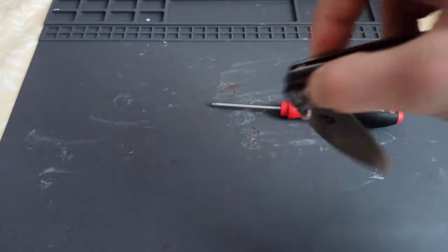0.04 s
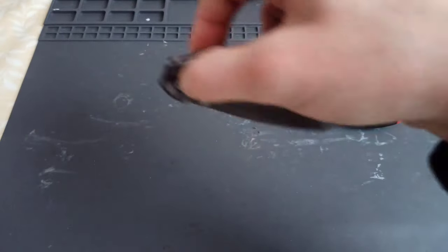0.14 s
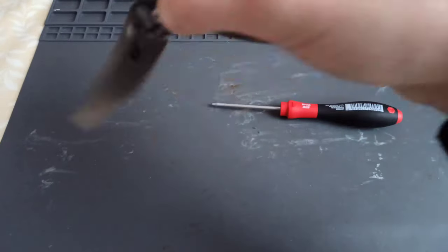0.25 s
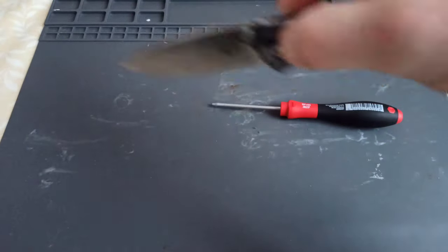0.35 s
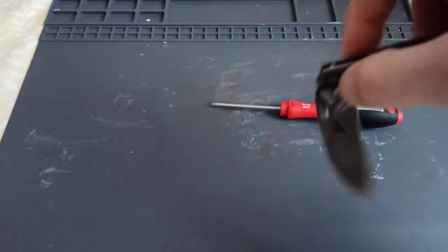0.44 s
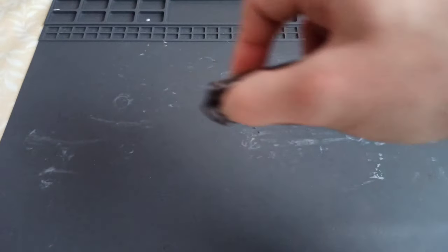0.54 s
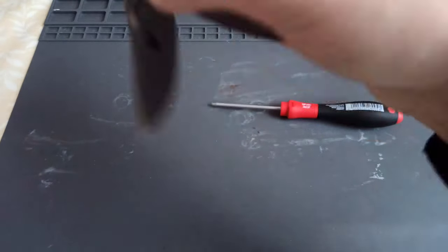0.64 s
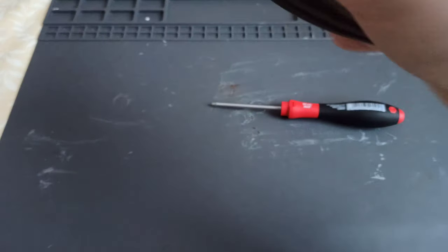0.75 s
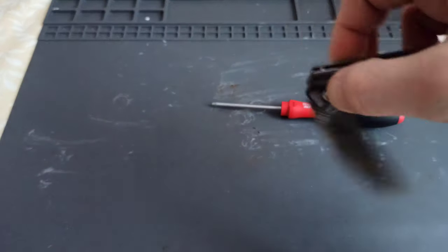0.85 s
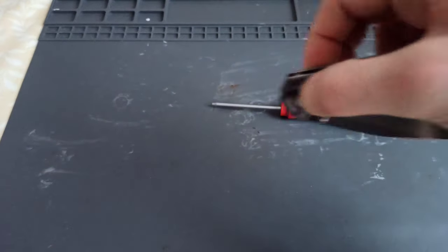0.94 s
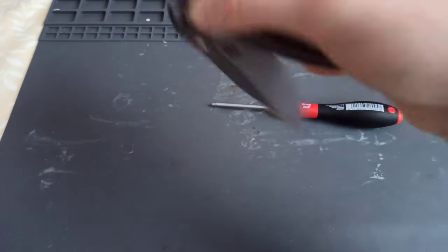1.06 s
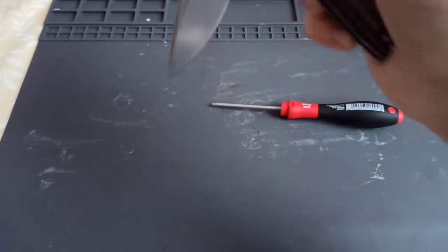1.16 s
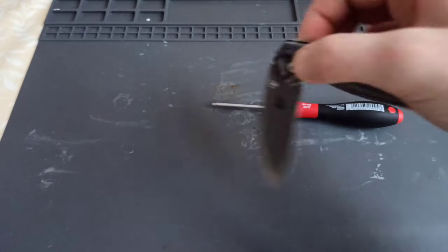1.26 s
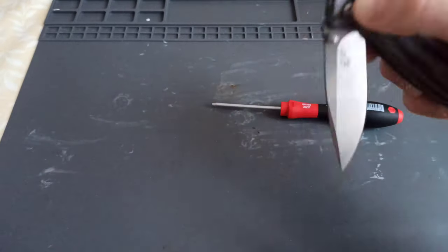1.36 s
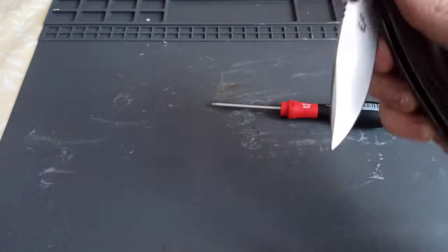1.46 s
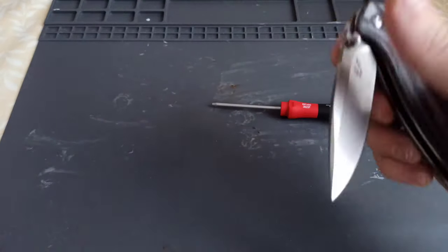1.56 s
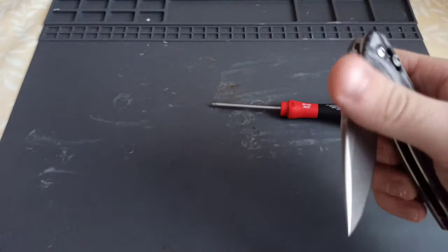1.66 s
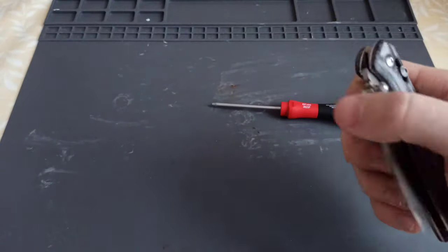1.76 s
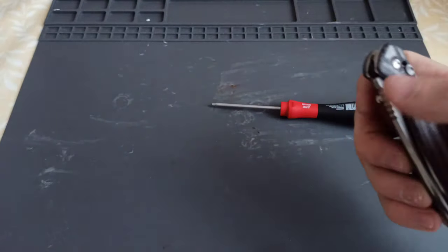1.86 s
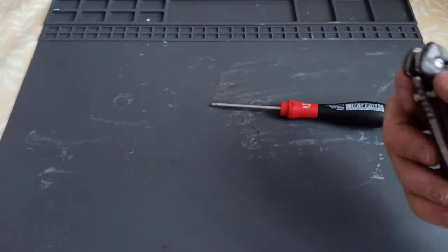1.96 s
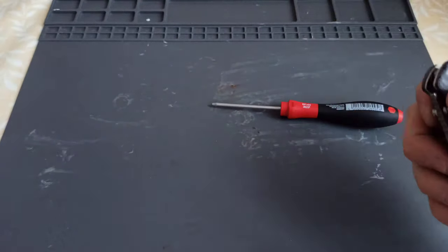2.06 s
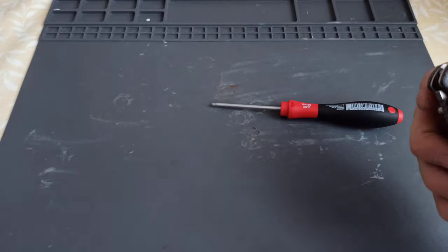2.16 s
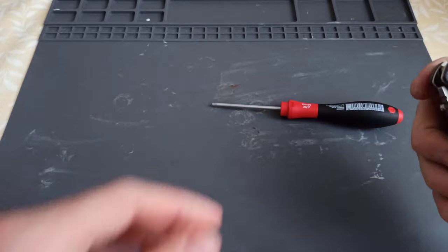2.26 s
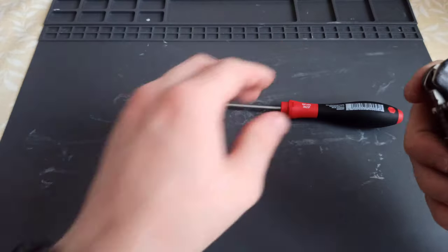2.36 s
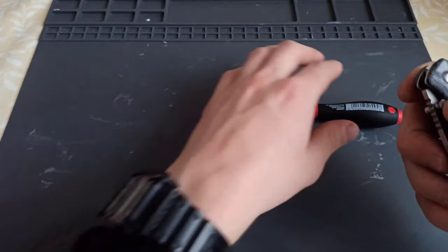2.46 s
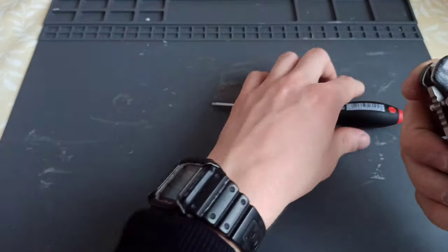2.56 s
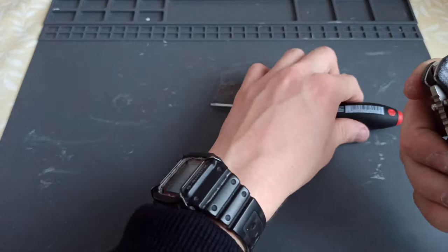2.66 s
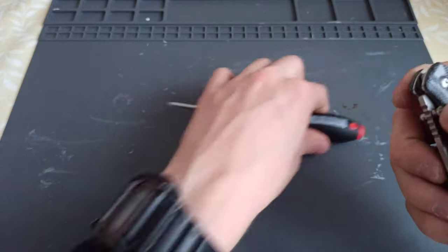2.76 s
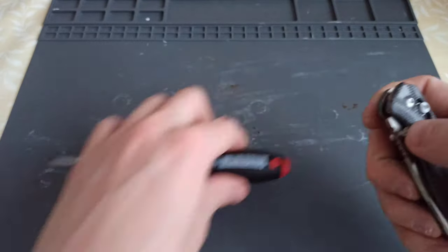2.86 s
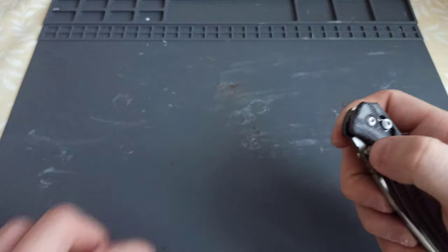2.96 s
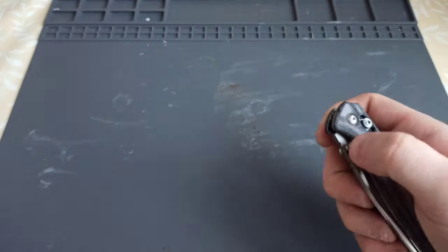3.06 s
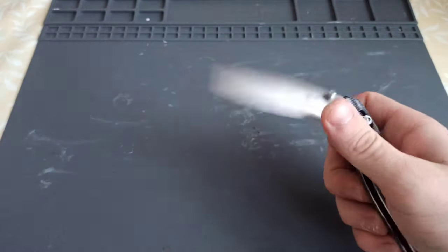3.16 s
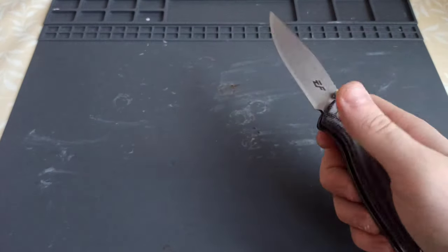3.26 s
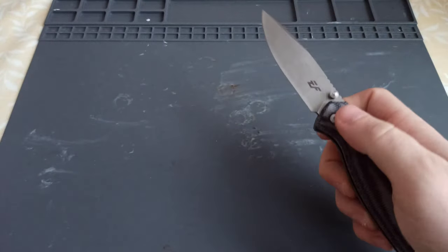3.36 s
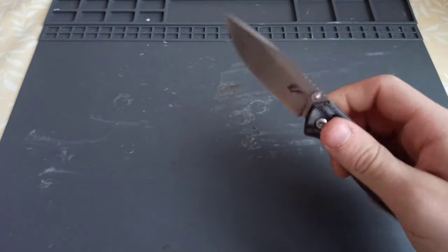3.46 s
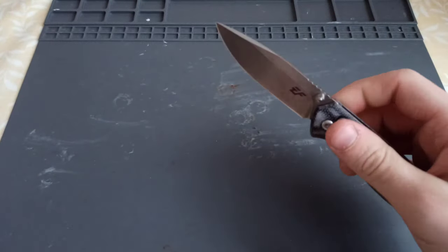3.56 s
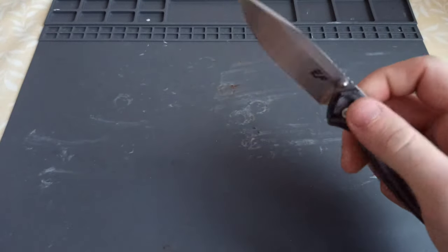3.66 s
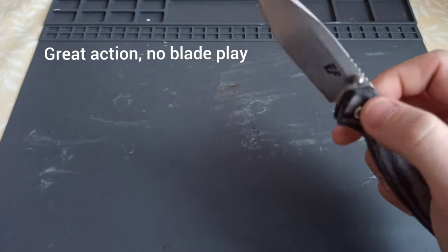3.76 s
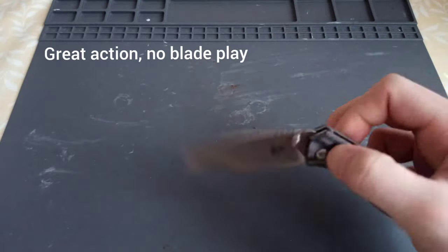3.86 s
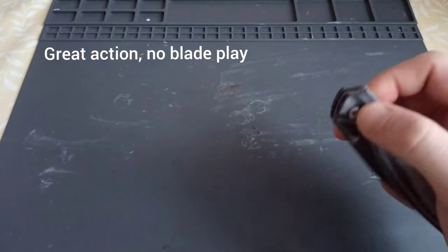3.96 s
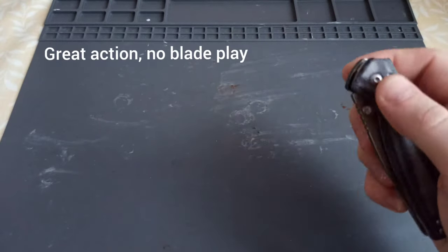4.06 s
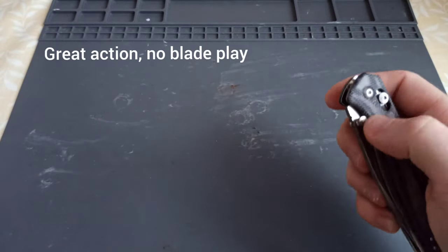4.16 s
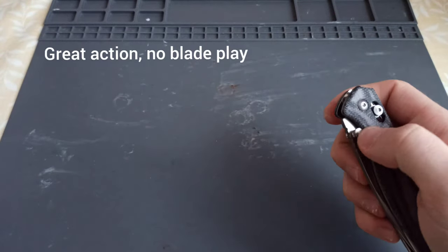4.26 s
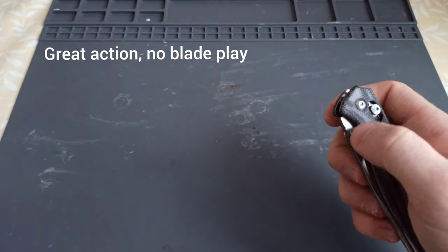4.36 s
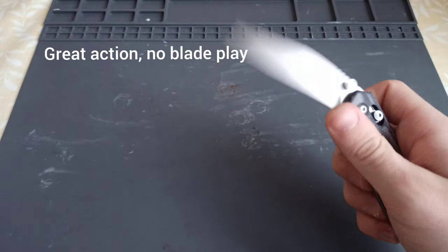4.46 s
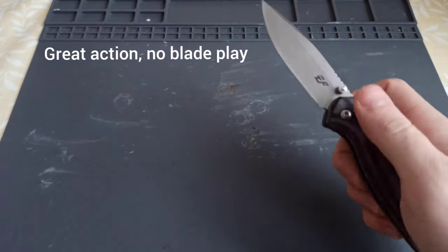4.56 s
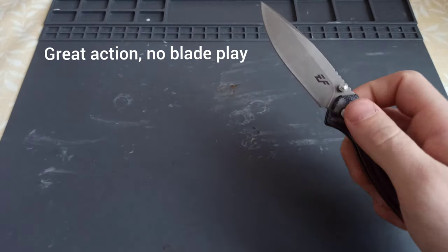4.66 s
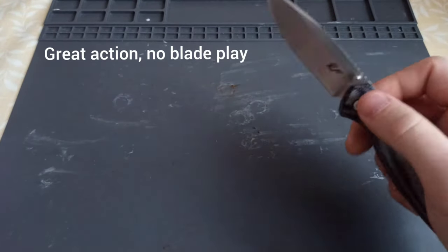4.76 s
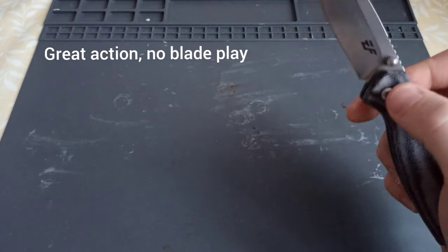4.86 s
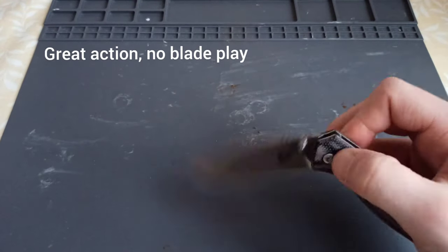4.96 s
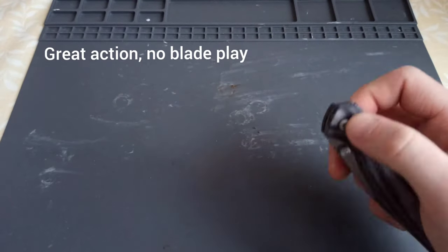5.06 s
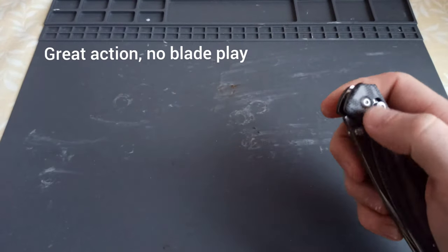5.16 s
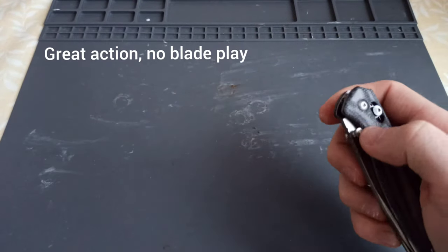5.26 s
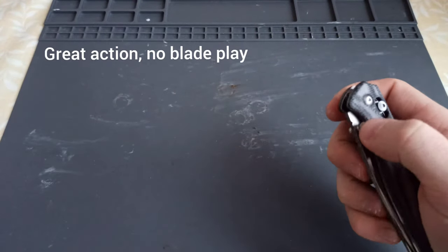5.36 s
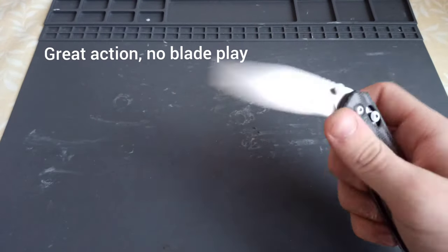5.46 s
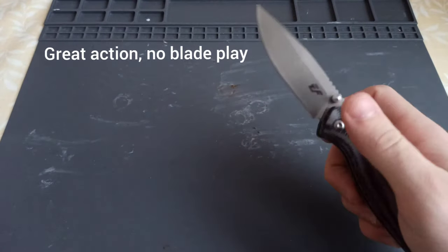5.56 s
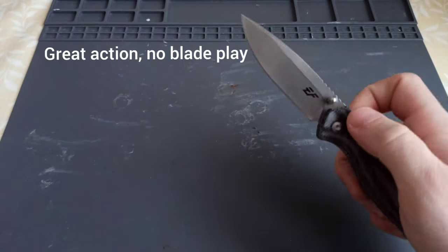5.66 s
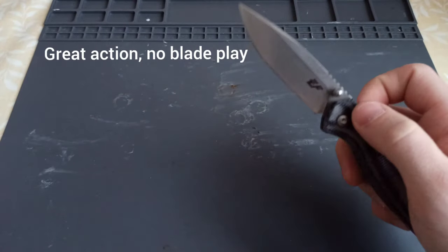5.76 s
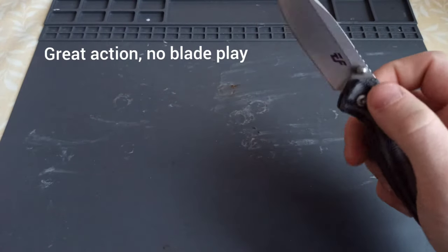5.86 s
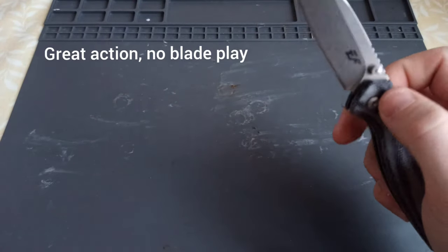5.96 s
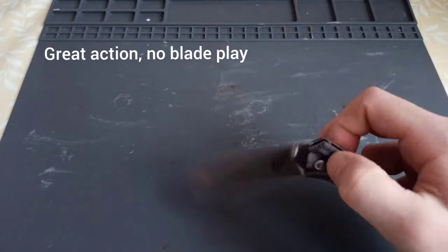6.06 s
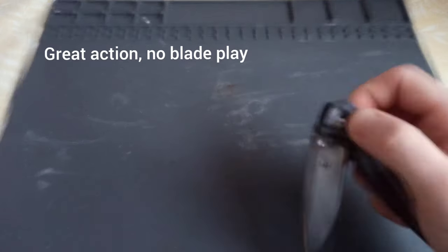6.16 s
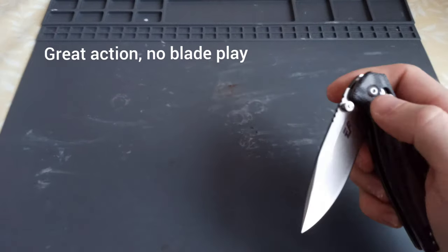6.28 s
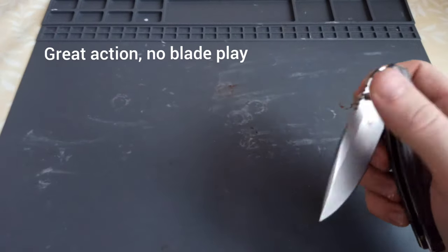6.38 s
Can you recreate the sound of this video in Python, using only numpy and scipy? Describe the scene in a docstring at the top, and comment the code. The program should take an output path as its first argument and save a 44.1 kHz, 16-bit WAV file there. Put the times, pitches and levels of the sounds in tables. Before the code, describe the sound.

Sharp steel clacks of a pocketknife opening and closing, with brief scrapes, soft hand pats on a rubber mat, and a final dull knock.

```python
"""Folding knife over a rubber mat

A folding knife is flicked open and snapped shut in a small quiet room, close to the microphone.
Steel contacts are bursts of noise through the knife's modes; swings and rubs are grainy filtered noise.
Pats on the mat and the desk knock that comes with the last snap are decaying low tones and a short push.
Sparse echoes add the room; shaped noise adds its tone and hiss."""
import sys
import numpy as np
from scipy import signal
from scipy.fft import rfft, irfft
from scipy.io import wavfile
from scipy.ndimage import uniform_filter1d

SR = 44100
rng = np.random.default_rng(int(sys.argv[2]) if len(sys.argv) > 2 else 0)


def output_pcm(signal):
    """Save a mono or channel-first signal as 16-bit PCM at the path in sys.argv[1].

    Samples are clipped to [-1, 1] before scaling.
    """
    pcm = np.clip(np.atleast_2d(signal).T, -1, 1) * 32767
    wavfile.write(sys.argv[1], SR, np.round(pcm).astype(np.int16))


N = 283122
TAPS = 4096  # length of the short filters
HZ = np.fft.rfftfreq(TAPS, 1 / SR)

# Blade flicked out against its stop. Each row: start in seconds, level in dB, handle knock in dB,
# body below 5 kHz in dB, top near 13 kHz in dB, ringing mode in Hz, room in dB.
OPENINGS = [(-.075, 14, -6.5, 1.5, -3.5, 6900, -6.5), (.3756, 17.5, -14.5, -2.5, -7, 6880, -10),
            (.8191, 13.3, -11.5, 4.5, -5, 7450, -8.5), (3.2551, 19.5, -4, -2.5, -11, 7580, -4.5),
            (4.5459, 18, -4, 0, -9, 7530, -3.5), (5.5584, 14.5, -1, 3, -5.5, 5870, -3.5)]
# Blade snapping back into the handle. Each row: start in seconds, level in dB, handle rattle in dB,
# body below 5 kHz in dB, top near 13 kHz in dB, ringing mode in Hz, room in dB.
CLOSINGS = [(0.9769, 14.5, -3, 2.5, -1, 6170, -6), (1.8464, 14.2, 14.5, 3.3, -5.5, 6340, -6.5),
            (4.0151, 14, 4.5, .5, -2, 7530, -7.5), (5.1141, 12.7, 4.5, -.5, -4.5, 7330, -7),
            (6.1735, 9, 12, 2.5, 3, 7700, -9)]
# Light contacts of lock bar, detent and rebounding blade. Each row: start in seconds, level in dB,
# body below 5 kHz in dB, top near 13 kHz in dB, ringing mode in Hz.
TICKS = [(.288, -19.5, -7, 1.5, 7300), (.6562, 1.5, -6.5, 0, 5700), (.954, -9.5, 3, -11, 5760),
         (1.2415, -20.5, 5.5, -13, 6490), (1.837, 3, -6, -15, 8400), (1.862, 8, 6.5, -4.5, 6200),
         (1.8712, 2, 8, -5.5, 6770), (2.0261, -8, -6.5, 2, 7550), (2.0367, -19, 1.5, -5, 7700),
         (3.181, -15.5, 11.5, -11, 6200), (3.9357, -2.5, -14.5, -12, 7350), (3.9926, 1, -2.5, 1.5, 7400),
         (4.0088, -2.5, -5.5, -16, 7670), (4.043, 2.5, 2.5, -12.5, 7300), (4.4745, -9.5, 9, -11.5, 7400),
         (4.9557, -1.6, -1, -9.5, 5850), (5.0098, -11.5, 3.5, -5, 7200), (5.049, -18, 5.5, -2.5, 6900),
         (5.0795, -10.5, 3, -8.5, 7000), (5.1087, 3.5, -7, 0, 7500), (5.4615, -21, 11, -4, 6770),
         (5.469, -9.5, 12, -4, 7500), (5.4765, -5.5, 10.5, -7.5, 7350), (5.5622, 10, -1, -10, 6400),
         (6.0438, -20, 0, -10, 8340), (6.0596, -3.5, 0, -6.5, 6700), (6.1213, -18, -2, -3.5, 7180),
         (6.2035, -10, 6, -6, 7200)]
# An open blade bends freely near 1.4 kHz; a shut one rattles the handle near 2 kHz.
OPEN = dict(clack_db=0, blade_db=1.5, handle_db=-5, ring_db=3.5, chatter_s=.00065)
SHUT = dict(knock_db=-1.5, clack_db=-6, blade_db=-10.5, ring_db=9, chatter_s=.00075)
LIGHT = dict(knock_db=-11.5, clack_db=-5, blade_db=-2.5, handle_db=.5, ring_db=8,
             chatter_s=.00063, room_db=-8.5)


def clicks():
    """The blade locks open and snaps shut, with light contacts before and after."""
    out = np.zeros(N)
    for s, db, knock_db, body_db, top_db, ring_hz, room_db in OPENINGS:
        add(out, s, strike(db, body_db, top_db, ring_hz, knock_db=knock_db, room_db=room_db, **OPEN))
    for s, db, handle_db, body_db, top_db, ring_hz, room_db in CLOSINGS:
        add(out, s, strike(db, body_db, top_db, ring_hz, handle_db=handle_db, room_db=room_db, **SHUT))
    for s, db, body_db, top_db, ring_hz in TICKS:
        add(out, s, strike(db, body_db, top_db, ring_hz, **LIGHT))
    return out


BLADE_BEND_HZ, BLADE_BEND_WIDTH_HZ = 1430, 580
HANDLE_BEND_HZ, HANDLE_BEND_WIDTH_HZ = 2030, 250


def strike(db, body_db, top_db, ring_hz, ring_db, knock_db, clack_db, blade_db, handle_db, chatter_s,
           room_db, ring_width_hz=520, spread_width_hz=1300, spread=.55, low_room_db=-2.5, blurred=.35):
    """One contact of steel on steel rings the knife; grip and blade position decide which modes speak."""
    # too small to radiate bass
    radiation = read([(30, -24.5), (150, 0), (250, 3), (600, -3), (800, -.5), (1100, 0)], HZ)
    body = knife_gain() * amp(radiation)
    # the room hears the knife from all sides at once, which fills the valleys between its modes
    blurred_power = uniform_filter1d(body ** 2, size=71) * np.minimum(HZ / 1500, 1) ** 2
    all_sides = np.sqrt((1 - blurred) * body ** 2 + blurred * blurred_power)

    hollow = read([(500, knock_db / 2 - 1.5), (800, knock_db), (1150, knock_db),
                   (1600, clack_db), (2800, clack_db), (3400, 0)], HZ)
    grip = read([(5000, body_db), (5900, 0), (8500, 0), (11500, top_db)], HZ)
    blade_bend = blade_db * bell(BLADE_BEND_HZ, BLADE_BEND_WIDTH_HZ)
    handle_bend = handle_db * bell(HANDLE_BEND_HZ, HANDLE_BEND_WIDTH_HZ)
    gain = amp(db + hollow + grip + blade_bend + handle_bend)
    blow = contact(chatter_s)[:TAPS // 2]

    # one mode beams at the microphone, while the room hears its neighbours as well
    beamed = causal(gain * body * amp(ring_db * bell(ring_hz, ring_width_hz)))
    neighbours_db = spread * ring_db * bell(ring_hz, spread_width_hz)
    scattered = causal(gain * all_sides * amp(room_db + neighbours_db + low_room_db * bell(1000, 900)))
    out = reflections(signal.fftconvolve(blow, scattered))
    add(out, 0, signal.fftconvolve(blow, beamed))
    return out


def contact(chatter_s, bounce_s=.0028, bounce_db=-12, hand_sway=.1):
    """Brief chatter between two steel faces, and its echo off the desk; even in spectrum overall."""
    t = np.arange(TAPS) / SR
    delay = bounce_s * (1 + hand_sway * rng.uniform(-0.998, 1))  # the hand is never at quite the same height
    direct = t / chatter_s
    late = np.maximum(t - delay, 0) / chatter_s
    envelope = direct * np.exp(-direct) + amp(bounce_db) * late * np.exp(-late)
    spectrum = rfft(rng.standard_normal(TAPS) * envelope)
    power = signal.convolve(abs(spectrum) ** 2, signal.windows.hann(81) / 40, "same")
    return irfft(spectrum / np.sqrt(power))


# Modes of blade, liners and handle. Each row: frequency in Hz, width in Hz, gain in dB.
KNIFE_MODES = [(861, 253, -8), (1460, 500, -18.5), (2121, 200, -16.5), (2600, 600, -19), (3440, 830, -13.5),
               (3960, 470, -11.5), (4590, 350, -11.5), (5160, 300, -12.5), (5627, 350, -7.5),
               (6270, 257, 0), (6760, 590, -4), (7510, 350, -3.5), (8307, 350, -7), (9580, 1700, -14.5),
               (11970, 1100, -13), (13200, 1300, -13), (15000, 800, -15)]


def knife_gain(between_db=-22):
    """The knife's modes over a bed of many weak ones."""
    power = sum((amp(db) * bell(hz, width_hz)) ** 2 for hz, width_hz, db in KNIFE_MODES)
    return np.sqrt(power + amp(between_db) ** 2)


# The lock bar's thin spring as it is let go. Each row: start in seconds, level in dB, pitch in Hz.
PINGS = [(.657, -38, 13300), (2.027, -40, 14500), (3.994, -33, 13900), (6.174, -31, 12700)]


def pings(t60_s=.012, attack_s=.0004):
    """The lock bar's spring gives a very high, very short ring: a decaying sine."""
    out, t = np.zeros(N), np.arange(SR // 20) / SR
    for s, db, hz in PINGS:
        envelope = decay(t, t60_s) * np.minimum(t / attack_s, 1)
        ring = np.sin(2 * np.pi * hz * t) * envelope
        add(out, s, room(amp(db) * ring, wet_db=-8))
    return out


# Pivot scrapes as the blade swings. Each row: start in seconds, length in seconds, scrape in dB,
# lower squeak in Hz, lower squeak in dB.
SWINGS = [(3.187, 0.061, -46, 2234, -49.5), (3.931, .016, -58, 2300, -51.5),
          (4.477, 0.061, -46.5, 2304, -45), (5.079, 0.026, -56, 2260, -58), (5.476, .054, -45.5, 2220, -44)]
# The upper squeak needs a hard flick: its level at that force, and the dB it gains per dB of scrape.
UPPER_HZ, UPPER_DB, HARD_FLICK_DB, UPPER_GROWTH = 3176, -42, -46, 2.4


def swings(upper_width_hz=520, lower_width_hz=240, top_db=0, rasp_db=4):
    """The lock bar rides over the tang: a scrape with two squeaks that follows the blade's speed."""
    out = np.zeros(N)
    scrape_colour = [(2500, -8), (3700, rasp_db), (5000, -2), (6000, 1.5), (7500, 4), (12000, top_db)]
    steel = knife_gain() * amp(read(scrape_colour, HZ))
    for s, length_s, db, lower_hz, lower_db in SWINGS:
        upper_db = UPPER_DB + UPPER_GROWTH * (db - HARD_FLICK_DB)
        progress = np.arange(round(length_s * SR)) / (length_s * SR)
        speed = np.interp(progress, [0, .08, .33, .6, 1], [0.024, .6, 0.85, .55, 0.38])
        middle = np.exp(-((progress - .36) / 0.13) ** 2)  # the lower squeak speaks only near full speed
        sound = amp(db) * friction(speed, steel, grain_db=-0.5)
        add(sound, 0, amp(upper_db) * squeak(speed ** 2, UPPER_HZ, upper_width_hz))
        add(sound, 0, amp(lower_db) * squeak(middle, lower_hz, lower_width_hz))
        add(out, s, room(sound, wet_db=-8.5))
    return out


def squeak(envelope, hz, width_hz, sag=.1):
    """A narrow, rough whistle, resonant noise on a carrier, whose pitch sags through the stroke."""
    size = len(envelope)
    radius = np.exp(-np.pi * width_hz / SR)
    noise = rng.standard_normal(size) + 1j * rng.standard_normal(size)
    wobble = signal.lfilter([1], [1, -2 * radius, radius ** 2], noise)
    turns = np.cumsum(hz * (1 - sag * np.linspace(-.4, .6, size))) / SR
    sound = envelope * (wobble * np.exp(2j * np.pi * turns)).real
    return evened(sound) * np.sqrt(np.mean(envelope ** 2))


def friction(envelope, gain, grain_db):
    """Uneven tiny slips under a stroke, ringing a body of the given gain."""
    size = len(envelope)
    grain = evened(uniform_filter1d(rng.standard_normal(size), size=40))
    slips = rng.standard_normal(size) * amp(grain_db * grain)
    ring = causal(gain)
    return signal.fftconvolve(evened(slips) * envelope, ring / np.linalg.norm(ring))


# Finger rubs on the handle, some lasting only a few tens of milliseconds, and one very short grainy tick
# (3.837). Each row: start in seconds, length in seconds, level in dB, body below 5 kHz in dB.
RUBS = [(1.24, .15, -68, -5.5), (1.43, 0.22, -71.5, -4), (1.609, .23, -68.5, 7), (2.189, .099, -71, 4),
        (3.837, 0.0078, -62, 3.5), (3.86, .07, -64, -6), (4.242, .022, -67, 12), (4.283, 0.078, -66, 9.5),
        (4.426, .03, -67.5, 6.5), (4.935, .02, -62, 2)]
# Colour of the rubs and grainy ticks. Each row: frequency in Hz, gain in dB.
RUB_COLOUR = [(600, -36), (1500, -16), (3000, -7), (4200, -7), (5300, -6), (6600, 0.5), (8000, -3.5),
              (10000, -13), (15000, -16)]
# Palm sliding over the mat. Each row: frequency in Hz, gain in dB.
SLIDE_COLOUR = [(150, -20), (400, -1.5), (700, 0.5), (1100, -9), (1650, -8.5), (3000, -20), (6000, -39.5)]
SLIDE_START_S, SLIDE_LENGTH_S, SLIDE_DB = 2.45, 0.32, -65.5


def rubs():
    """Grainy noise strokes: finger rubs on the handle, one very short tick, and the palm on the mat."""
    out = np.zeros(N)
    for s, length_s, db, body_db in RUBS:
        colour_db = read(RUB_COLOUR, HZ) + read([(4200, body_db), (5900, 0)], HZ)
        add(out, s, stroke(length_s, db, amp(colour_db), grain_db=4.0))
    slide = stroke(SLIDE_LENGTH_S, SLIDE_DB, amp(read(SLIDE_COLOUR, HZ)), grain_db=3.0)
    add(out, SLIDE_START_S, slide)
    return out


def stroke(length_s, db, band, grain_db, catch_db=3):
    """One soft, grainy stroke of friction with an uneven level, as when skin catches and lets go."""
    size = round(length_s * SR)
    # a new random level every 10 ms
    catch_curve = np.interp(np.arange(size) / SR, np.arange(50) / 100, rng.standard_normal(50))
    envelope = signal.windows.tukey(size, .7) * evened(amp(catch_db * catch_curve))
    return room(amp(db) * friction(envelope, band, grain_db), wet_db=-6.5)


# Hand landing softly on the mat. Each row: start in seconds, level in dB, pitch in Hz.
PATS = [(2.592, -40.5, 118.8), (2.719, -46, 122), (3.196, -52, 135.3), (5.118, -50.5, 140.4)]


def pats(swell_s=0.0046):
    """A palm on rubber: a few low cycles, and the room's answer."""
    out, t = np.zeros(N), np.arange(SR // 10) / SR
    for s, db, hz in PATS:
        push = (t / swell_s) ** 2 * np.exp(-t / swell_s)
        thump = push / push.max() * np.sin(2 * np.pi * hz * t)
        add(out, s, room(amp(db) * thump, wet_db=-6))
    return out


# Dull body of the desk knock. Each row: frequency in Hz, gain in dB.
KNOCK_BODY = [(30, -41.5), (70, -13.5), (120, -2.5), (170, -10), (240, 0), (400, -2), (540, -3.5),
              (680, -17), (1000, -20.5), (1800, -22), (2600, -49), (6000, -74)]
# Modes of the desk top. Each row: frequency in Hz, level in dB, t60 in seconds.
DESK_MODES = [(127.2, -34.5, .38), (232, -47.5, .45), (340, -39, 0.35), (383, -43.5, .3), (487, -39.5, .42),
              (555, -46.5, 0.43), (622, -50, .36)]
KNOCK_S, KNOCK_DB = 6.1752, 20.3


def knock():
    """A short hard push on the desk, after which the top rings in its low modes."""
    out, t = np.zeros(N), np.arange(SR // 2) / SR
    push = causal(amp(KNOCK_DB + read(KNOCK_BODY, HZ)))
    add(out, KNOCK_S, room(push, wet_db=-8.5))
    for hz, mode_db, t60_s in DESK_MODES:
        add(out, KNOCK_S, amp(mode_db) * np.sin(2 * np.pi * hz * t) * decay(t, t60_s))
    return out


# Decay time of the room. Each row: frequency in Hz, t60 in seconds.
ROOM_T60 = [(120, 0.27), (500, .33), (1300, .27), (3500, .27), (6600, 0.25), (9000, 0.2), (15000, 0.18)]


def reflections(x, first_s=.004, build_s=.02, early=1.2):
    """Sparse echoes: the near ones from the desk, then the walls, each band dying at its own speed."""
    size = SR // 2
    t = np.arange(size) / SR
    sparse = rng.random(size) < 4000 / SR  # about 4000 echoes per second
    taps = rng.choice([-1., 1.], size) * sparse * (t > first_s) * np.interp(t, [0, build_s], [early, 1])
    hz, age, bands = signal.stft(taps, SR, nperseg=256)
    fade = decay(np.maximum(age - build_s, 0), read(ROOM_T60, hz)[:, None])
    tail = signal.istft(bands * fade, SR, nperseg=256)[1]
    return signal.fftconvolve(x, tail / np.linalg.norm(tail))


def room(x, wet_db):
    """A sound together with its echoes."""
    out = amp(wet_db) * reflections(x)
    add(out, 0, x)
    return out


# Room tone and hiss. Each row: frequency in Hz, relative density in dB.
AIR_COLOUR = [(20, -22.5), (45, -14), (85, 1), (140, 1), (280, -2.5), (700, -10.5), (1200, -15.5),
              (2300, -22.5), (4500, -22), (5400, -32.5), (6500, -21.5), (8400, -26.5), (10000, -33.5),
              (15000, -24)]
AIR_RMS_DB = -64.5  # ahead of the microphone's response


def air():
    """Steady room tone with a little hiss: shaped noise."""
    return amp(AIR_RMS_DB) * evened(coloured(rng.standard_normal(N), AIR_COLOUR))


def amp(db):
    """Decibels to gain."""
    return 10 ** (np.asarray(db) / 20)


def decay(t, t60_s):
    """Exponential fade by 60 dB in t60_s."""
    return np.exp(-np.log(1000) * t / t60_s)


def evened(x):
    """Scales to rms 1."""
    return x / np.sqrt(np.mean(x ** 2) + 1e-20)


def read(points, hz):
    """Reads a table of (Hz, value) on a log-frequency axis."""
    f, value = np.transpose(points)
    return np.interp(np.log(hz + 1), np.log(f + 1), value)


def add(mix, s, sound):
    """Mixes a sound in at time s; a negative time cuts off its beginning."""
    start = round(s * SR)
    sound = sound[max(-start, 0):]
    part = mix[max(start, 0):][:len(sound)]
    part += sound[:len(part)]


def bell(centre_hz, width_hz):
    """Gain of one resonance, 1 at its centre."""
    return 1 / (1 + (2 * (HZ - centre_hz) / width_hz) ** 2)


def causal(gain):
    """The minimum-phase impulse response of this gain, which rings only after the blow."""
    cepstrum = irfft(np.log(np.maximum(gain, 1e-5)))
    cepstrum[1:TAPS // 2] *= 2
    cepstrum[TAPS // 2 + 1:] = 0
    return irfft(np.exp(rfft(cepstrum)))


def coloured(x, points):
    """Filters a long sound by a table of (Hz, dB)."""
    gain = amp(read(points, np.fft.rfftfreq(len(x), 1 / SR)))
    return irfft(rfft(x) * gain, len(x))


def scene():
    """Knife, hands and desk in the quiet room."""
    return (clicks() + pings() + swings() + rubs() + pats() + knock() + air())[None]


# Microphone response, little deep bass and a trough in the treble. Each row: frequency in Hz, gain in dB.
MIC_RESPONSE = [(20, -12), (70, 0), (8450, 0), (8650, -10), (10000, -12), (11400, -16), (11700, 0),
                (15400, 0), (15650, -21)]
EDGE_HZ = 16450


def record(dry):
    """Microphone colour, then the band limit."""
    heard = coloured(dry[0], MIC_RESPONSE)
    lowpass = signal.firwin(511, EDGE_HZ, window=("kaiser", 9), fs=SR)
    return signal.oaconvolve(heard, lowpass, "same")[None]


dry = scene()
out = record(dry)
output_pcm(out)
```